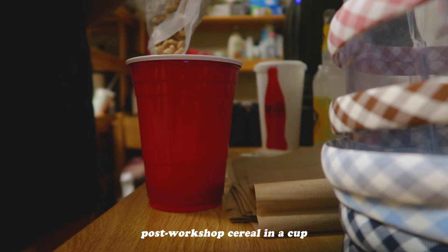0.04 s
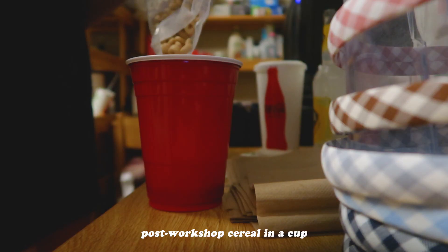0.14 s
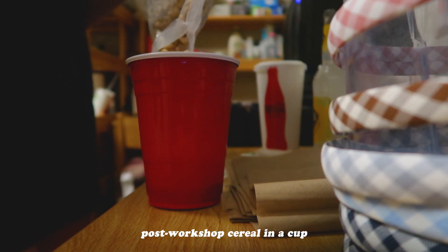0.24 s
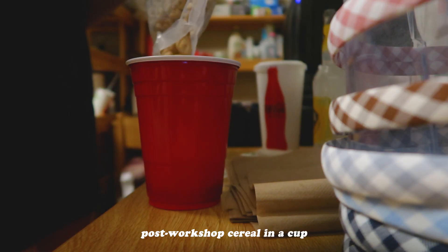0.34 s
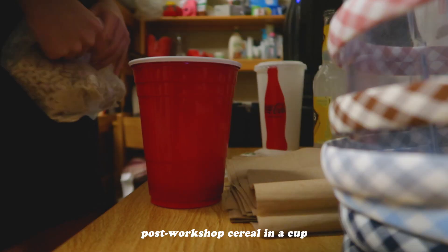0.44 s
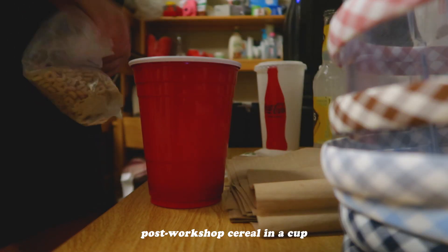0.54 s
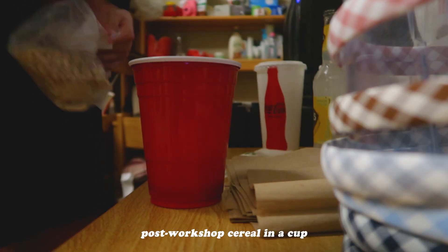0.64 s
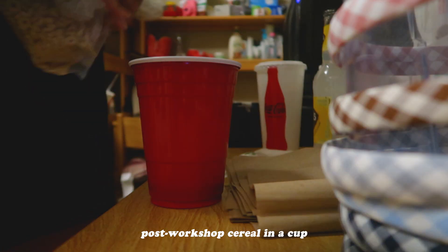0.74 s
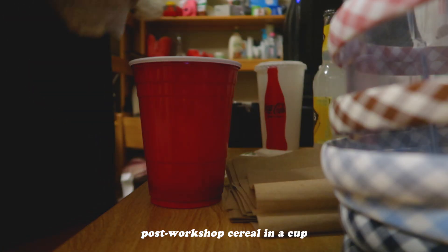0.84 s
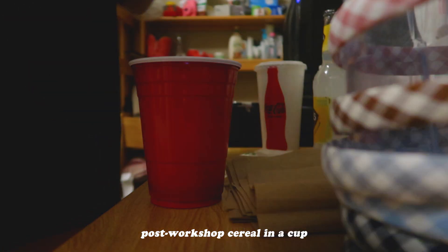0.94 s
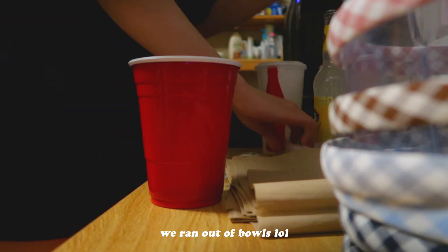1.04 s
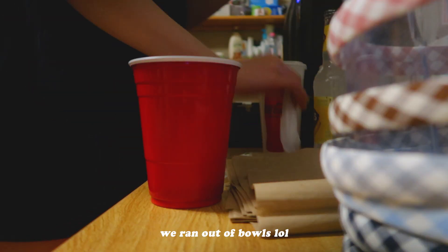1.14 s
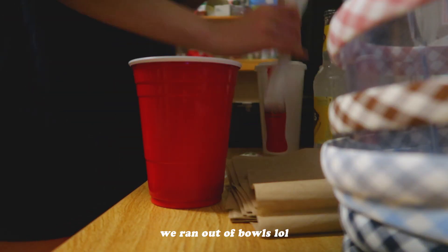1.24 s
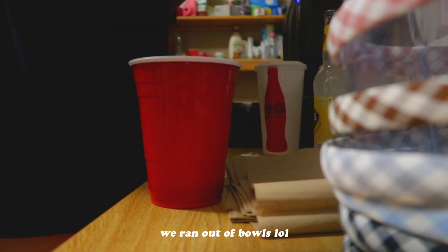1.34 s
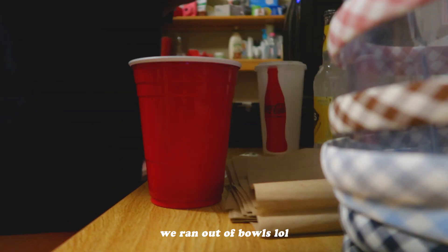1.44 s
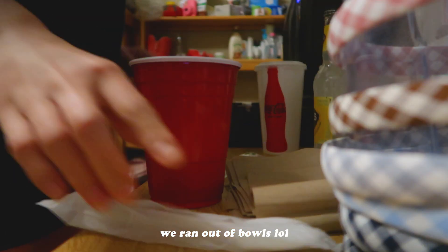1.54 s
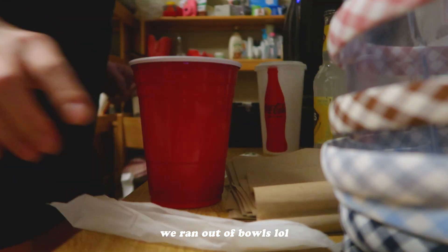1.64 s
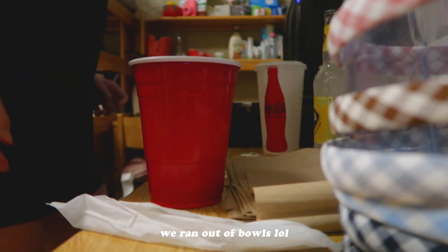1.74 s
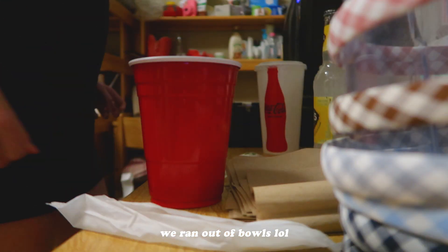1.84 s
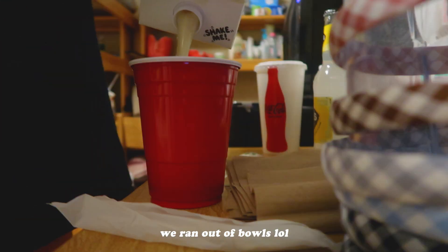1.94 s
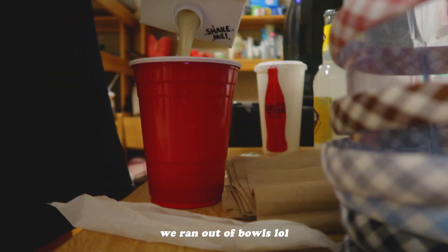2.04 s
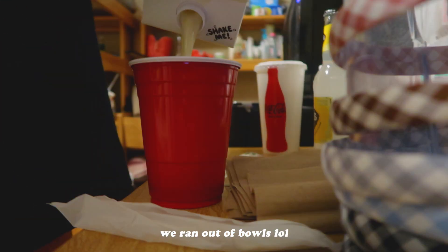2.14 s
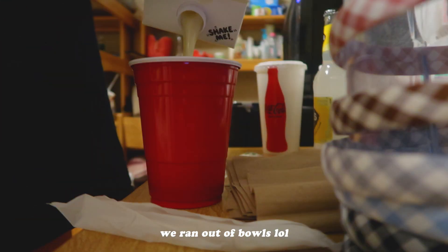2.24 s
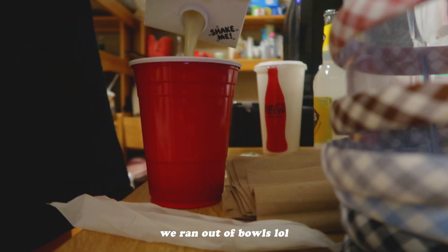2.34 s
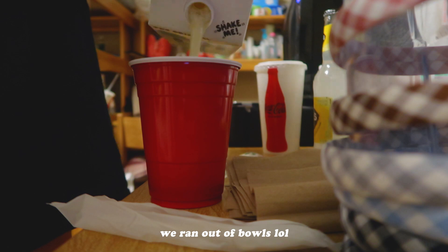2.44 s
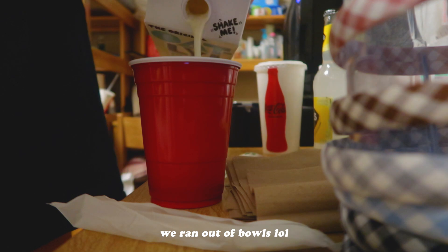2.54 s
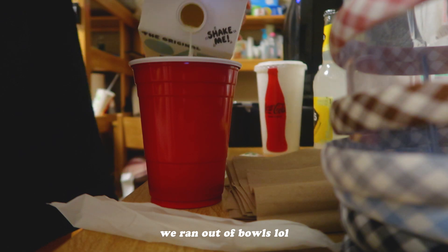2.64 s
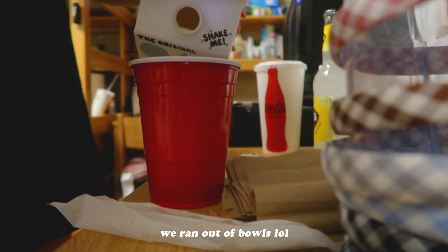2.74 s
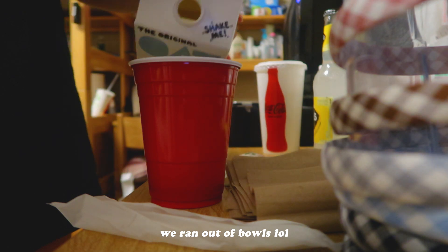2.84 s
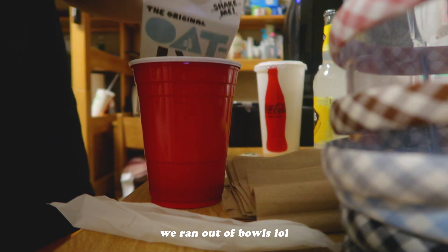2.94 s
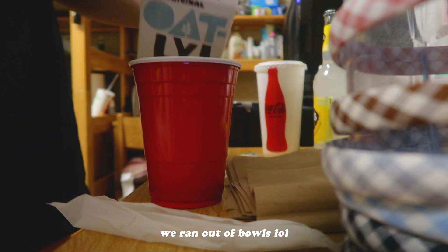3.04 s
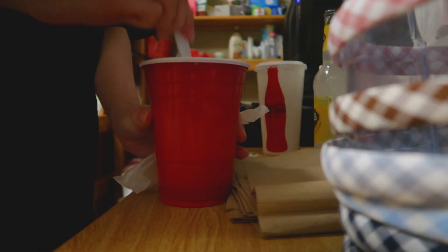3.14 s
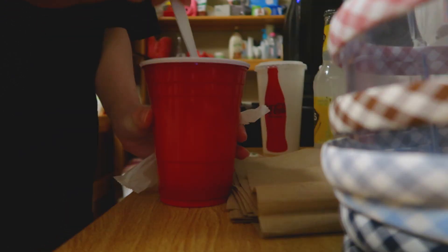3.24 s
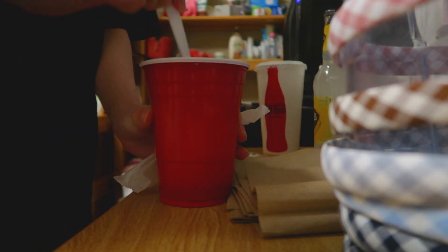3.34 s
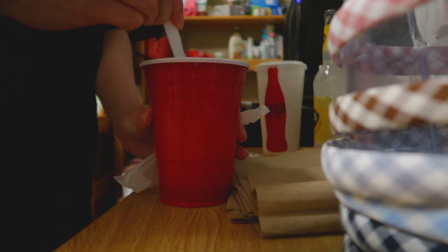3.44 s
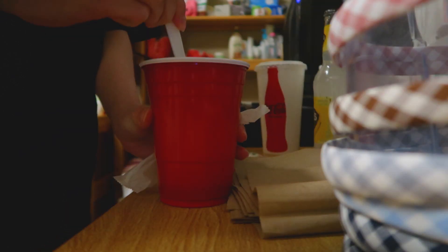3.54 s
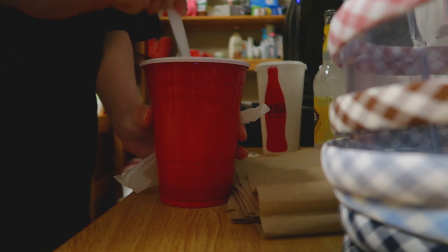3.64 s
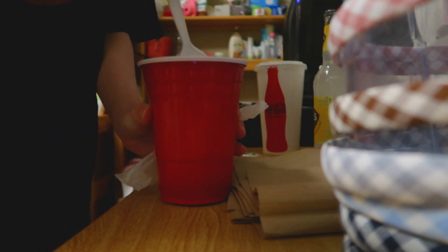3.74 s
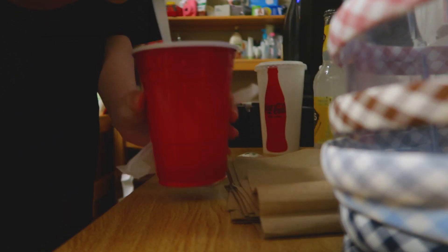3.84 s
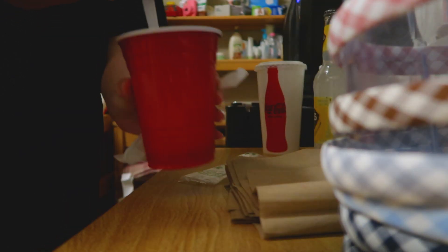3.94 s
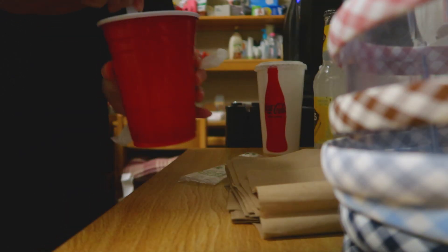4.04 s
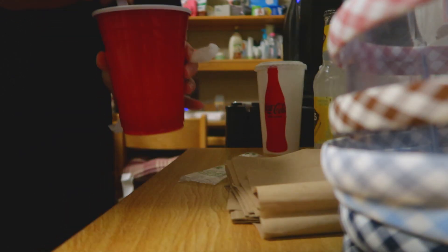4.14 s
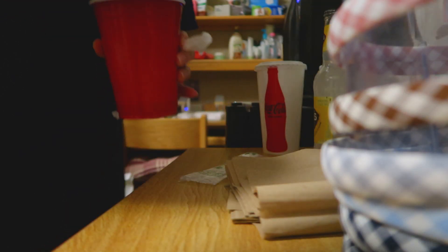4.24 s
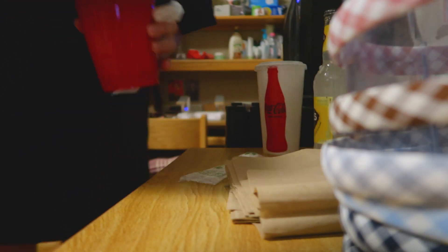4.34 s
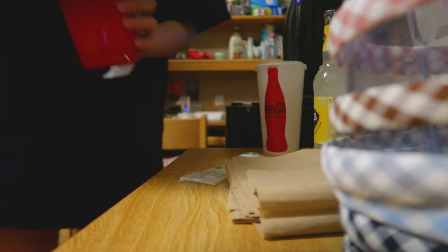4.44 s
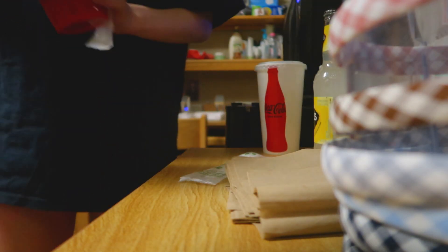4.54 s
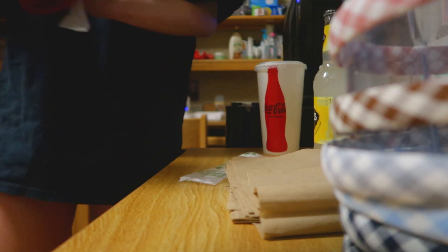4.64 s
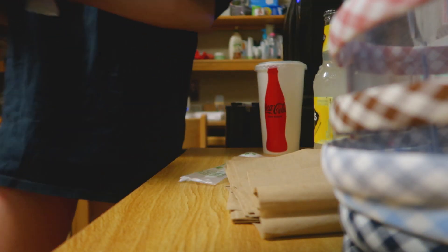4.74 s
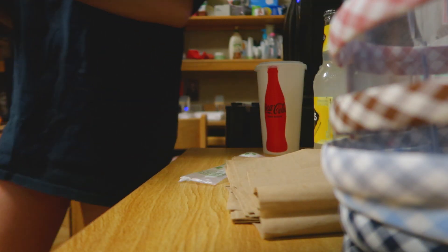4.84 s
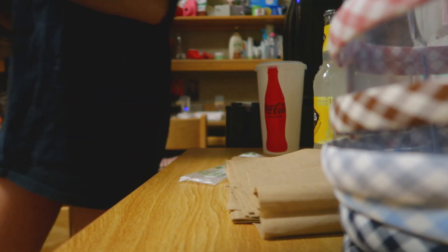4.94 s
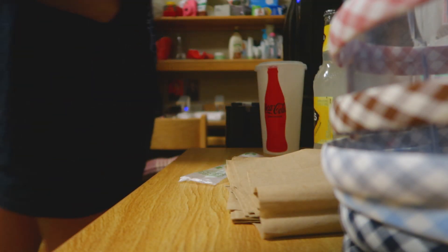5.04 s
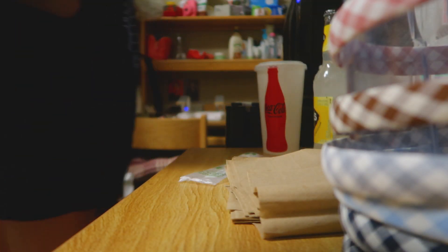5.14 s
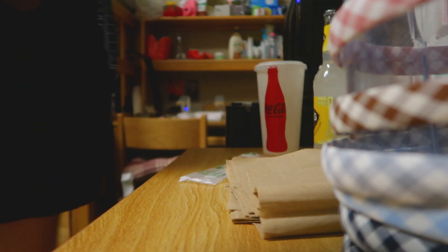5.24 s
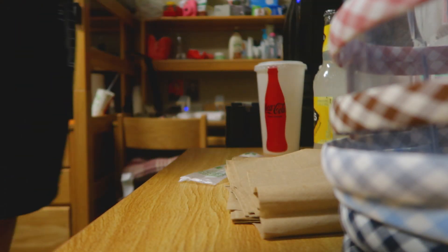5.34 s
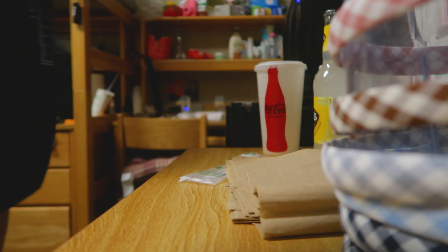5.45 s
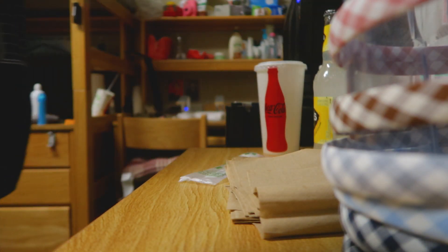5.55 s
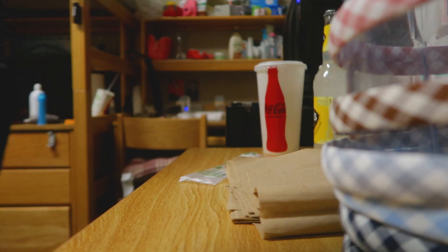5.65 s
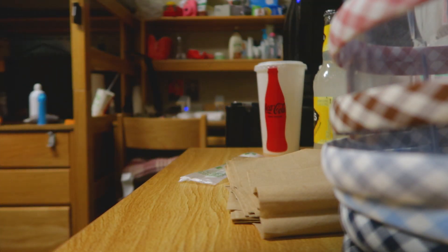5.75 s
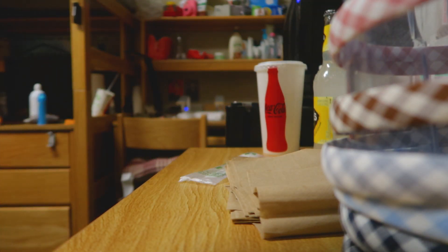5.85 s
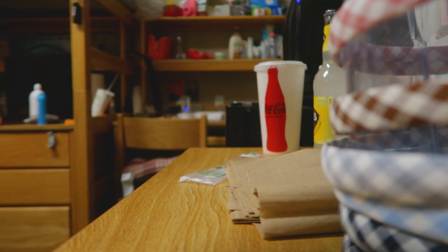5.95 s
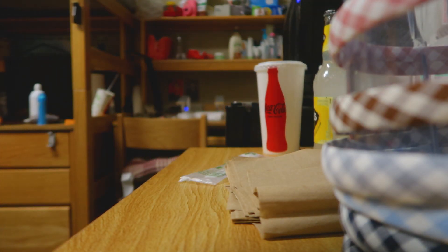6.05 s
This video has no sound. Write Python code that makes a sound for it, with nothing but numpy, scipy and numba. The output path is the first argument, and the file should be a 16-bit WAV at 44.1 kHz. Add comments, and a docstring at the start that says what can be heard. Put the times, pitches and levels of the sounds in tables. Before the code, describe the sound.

A close, dry stereo perspective at a wooden desk in a small ventilated room. From 0 to 0.43 s, dry cereal pieces drop irregularly into a nearly empty plastic cup, cracking, hopping and briefly ringing its wall over trickling crumbs. From 0.44 to 1.04 s a stiff plastic bag crumples with bright, sharp folds, while a low hum comes up underneath. Soft desk thumps at about 1.06 s lead into papery napkin rustling, strongest near 1.5 s. A plastic spoon clacks down at 1.6 s, bouncing until 1.72 s with tiny late ticks. Milk begins faintly around 2.0 s, swells at 2.25 s, patters with fine bubbles and fades into drips by 3.1 s. From 3.15 to 4.6 s a spoon crunches through cereal and knocks the damped cup, with low bumps near 3.5 s. Quiet clothing rustles from 4.8 s to the end, around 6 s, over the hum.

```python
"""In a small ventilated room with a faint hum, at a wooden desk, a snack is made, heard through two nearby ports.
Dry cereal cracks into a plastic cup, a bag is crumpled, a napkin is fetched and a plastic spoon clacks down.
Milk patters and bubbles, the spoon crunches through the cereal and knocks on the cup, then clothes rustle.
Impacts are decaying resonances with noise bursts; rustles, pouring and crunching are crowds of tiny snaps,
shaped by moves that swell, hold and die away or by curves of level."""
import sys
import numpy as np
from scipy import signal
from scipy.fft import rfft, irfft, next_fast_len
from scipy.io import wavfile
from scipy.ndimage import uniform_filter1d
from numba import njit

SR = 44100
rng = np.random.default_rng(int(sys.argv[2]) if len(sys.argv) > 2 else 0)


def to_wav(sig):
    """Store sig (one row per channel, or 1-D mono) as 16-bit WAV at the path in sys.argv[1].

    Samples outside -1..1 are clipped; the rate is SR.
    """
    pcm = np.clip(np.atleast_2d(sig), -1, 1) * 32767
    pcm = np.round(pcm).astype(np.int16)
    wavfile.write(sys.argv[1], SR, pcm.T)  # frames by channels


N = 268076
T = np.arange(N) / SR
TAIL = T[:SR // 3]  # time axis of a single impact


def amp(db):
    """Level law: decibels to amplitude gain."""
    return 10 ** (np.asarray(db) / 20)


def unit(x):
    """Normalisation of energy: scale to rms 1."""
    return x / np.sqrt(np.mean(x ** 2) + 1e-18)


def add(track, s, sound):
    """Superposition: mix a sound in at a time. Its two rows are sum and difference of the ports."""
    i = int(np.clip(s * SR, 0, N - 1))
    track[:, i:i + sound.shape[1]] += sound[:, :N - i]


def colour(x, points):
    """Minimum-phase filtering: a causal filter with a (Hz, dB) outline, built from its cepstrum."""
    size = next_fast_len(x.shape[-1] // 2 + 2048) * 2
    hz, db = np.transpose(points)
    f = np.arange(size // 2 + 1) * SR / size
    outline_db = np.interp(np.log(f + 1), np.log(hz), db)
    cepstrum = irfft(np.log(amp(outline_db)))
    # folding the cepstrum onto positive time makes the filter causal
    cepstrum[1:size // 2] *= 2
    cepstrum[size // 2 + 1:] = 0
    response = np.exp(rfft(cepstrum))
    return irfft(rfft(x, size) * response)[..., :x.shape[-1]]


def band(x, hz, kind):
    """Band splitting: a steep low-pass or high-pass."""
    sos = signal.butter(4, min(hz, SR / 2 - 1), kind, fs=SR, output="sos")
    return signal.sosfilt(sos, x)


def fade(t60):
    """Exponential damping: 60 dB of decay in t60 seconds."""
    return np.exp(-np.log(1000) * TAIL / t60)


def ring(hz, t60, rise_s=0.00042, glide=0):
    """Damped resonance: one struck mode swells over the contact time; its pitch may rise as it dies."""
    t = TAIL[TAIL < 1.2 * t60]
    cycles = hz * (t + glide * t ** 2 / t60 / 2) + rng.random((2, 1))
    swell = 1 - np.exp(-(t / rise_s) ** 2)
    tone = swell * fade(t60)[:len(t)] * np.sin(2 * np.pi * cycles)
    return np.pad(tone, ((0, 0), (0, len(TAIL) - len(t))))


def burst(t60):
    """Incoherent scattering: exponentially decaying noise."""
    return fade(t60) * rng.standard_normal((2, len(TAIL)))


def strike(modes, detune, scatter_db):
    """Modal excitation: every blow lands elsewhere and so weights the modes differently."""
    total = 0
    for hz, db, t60 in modes:
        level_chance, pitch_chance = rng.uniform(-0.57, 1, 2)
        mode = ring(hz * (1 + detune * pitch_chance), t60)
        total = total + amp(db + scatter_db * level_chance) * mode
    return total


def drift(t, per_s):
    """Slow random modulation: straight lines between random values."""
    return np.interp(t * per_s, np.arange(len(TAIL)), rng.standard_normal(len(TAIL)))


def strokes(rows):
    """Power addition: gains of body and treble for moves that swell, hold and die away."""
    power = np.zeros((2, N))
    for s, db, attack_s, hold_s, release_s, treble_db in rows:
        span = slice(*np.searchsorted(T, [s - 2 * attack_s, s + hold_s + 2 * release_s]))
        before, after = (s - T[span]) / attack_s, (T[span] - s - hold_s) / release_s
        away = np.maximum(before, after).clip(0)
        # attack and release are the times for 20 dB
        power[:, span] += amp([[db], [db + treble_db]]) ** 2 * amp(-20 * away) ** 2
    return np.sqrt(power)


def follow(curve):
    """Envelope control: gains along a curve of (s, dB, ..) rows, silent outside it."""
    s, *levels = np.transpose(curve)
    inside = (T >= s[0]) & (T <= s[-1])
    return np.array([amp(np.interp(T, s, db)) for db in levels]) * inside


@njit
def resonate(x, hz, width):
    """Time-varying resonance: a band-pass whose centre moves from sample to sample."""
    out, mid, low = np.empty(len(x)), 0., 0.
    for i in range(len(x)):
        g, k = np.tan(np.pi * hz[i] / SR), width / hz[i]
        v = (mid + g * (x[i] - low)) / (1 + g * (g + k))
        mid, low, out[i] = 2 * v - mid, low + 2 * g * v, k * v
    return out


def crackle(gains, outline, rate, spread_db, snap_t60, rub_db=-12, split_hz=4000, air=(),
            air_rise_per_s=0, tail_db=-1, patchy_db=2.0, count=16):
    """Stochastic snapping: tiny snaps of uneven size and pitch over a faint rub; gains drive body and treble."""
    shifts_per_s, air_wander = 25, 0.03
    active = np.flatnonzero(gains[0])
    span = slice(active[0], active[-1] + 1)
    t = T[span]
    chance = rng.random(N)[span]
    size = rng.exponential(size=N)[span]
    facet = rng.integers(count, size=N)[span]
    polarity = rng.choice([-1, 1], (2, N))[:, span]
    snaps = (chance < rate / SR) * amp(spread_db * np.minimum(size, 4)) * polarity  # rate: snaps per second
    scatter, rub = rng.standard_normal((2, 2, N))[..., span]
    keep = np.exp(-2 * np.log(1000) / (snap_t60 * SR))  # power kept per sample
    # each snap comes from one facet: large facets clack low, small ones tick high; strain wanders between them
    force = 0
    for k, hz in enumerate(np.geomspace(400, 13000, count)):
        clicks = amp(patchy_db * drift(t, shifts_per_s)) * snaps * (facet == k)
        tail_power = signal.lfilter([1 - keep], [1, -keep], clicks[0] ** 2 + 1e-18)
        tails = np.sqrt(tail_power) * np.roll(scatter, k * len(t) // count, axis=1)
        knock = clicks + amp(tail_db) * tails
        force = force + signal.lfilter(*signal.iirpeak(hz, 2, SR), knock) + amp(-11.0) * knock
    sound = colour(unit(force) + amp(rub_db) * rub, outline)
    for hz, width, db in air:  # the air in the cup shifts as things move in it
        centre = hz * np.exp(air_rise_per_s * (t - t.mean()) + air_wander * drift(t, shifts_per_s))
        sound = sound + amp(db) * np.array([resonate(row.copy(), centre, float(width)) for row in sound])
    # a big snap relieves its neighbours: the short-term level is evened out
    sound = sound / np.sqrt(uniform_filter1d(sound[0] ** 2, size=1800) + 1e-12)
    body, treble = unit(band(sound, split_hz, "low")), unit(band(sound, split_hz, "high"))
    out = np.zeros((2, N))
    out[:, span] = gains[0, span] * body + gains[1, span] * treble
    return out


# Spectrum of brittle cracks. Each row: frequency in Hz, level in dB.
CRACK_SPECTRUM = [(800, -55), (2800, 2), (6200, -1.5), (8000, -20), (15500, -25)]


def crack(t60=0.011):
    """Brittle fracture: a short burst of bright noise as something gives way."""
    return colour(burst(t60), CRACK_SPECTRUM)


def buckle(rows, outline, t60, sheet_t60, sheet_db):
    """Snap-through buckling: a fold gives a short pitched tick and a crack, and shakes the sheet around it."""
    out = np.zeros((2, N))
    for s, db, hz, crack_db in rows:
        sheet = colour(burst(sheet_t60), outline)
        add(out, s, amp(db) * (ring(hz, t60) + amp(sheet_db) * sheet + amp(crack_db) * crack()))
    return out


# Curve of the low hum. Each row: time in seconds, level in dB before the tone and rumble balance.
HUM_CURVE = [(0, -94), (0.45, -52), (1.15, -45.5), (1.65, -50.5), (6.08, -50.5)]
# Spectrum of the ventilation noise. Each row: frequency in Hz, relative level in dB.
ROOM_SPECTRUM = [(65, -22), (110, -7), (274, -4.5), (500, -16), (1070, -20), (2610, -28), (7060, -38),
                 (12600, -45), (15500, -62)]
HUM_HZ, ROOM_DB = 57.5, -51


def background(tone_db=-5.0, rumble_db=-3):
    """Stationary noise and phase modulation: ventilation, and a slightly wavering hum with its rumble."""
    tone = unit(np.sin(2 * np.pi * HUM_HZ * T + 0.14 * drift(T, 6)))
    rumble_spectrum = [(10, -6), (50, -5), (115, 0.0), (250, -35), (2000, -83)]
    rumble = unit(colour(rng.standard_normal((2, N)), rumble_spectrum))
    hum_gain = amp(np.interp(T, *np.transpose(HUM_CURVE)))
    hum = hum_gain * (amp(tone_db) * tone + amp(rumble_db) * rumble)
    ventilation = unit(colour(rng.standard_normal((2, N)), ROOM_SPECTRUM))
    return hum + amp(ROOM_DB) * ventilation


# Soft bumps on the desk. Each row: start in seconds, level in dB, pitch in Hz, 60 dB decay in seconds.
DESK_BUMPS = [(1.058, -25, 320, 0.057), (1.125, -25.5, 139, 0.18), (1.141, -31, 223, 0.12),
              (1.644, -26, 303, 0.069), (1.646, -31.5, 75.1, 0.14), (3.463, -24.5, 139.5, 0.12),
              (3.519, -22.5, 133, 0.043)]


def desk(push_s=0.0013, thud_db=2.0, thud_t60=0.43):
    """Soft-contact excitation: a push builds up over a few milliseconds and leaves a low boom."""
    out = np.zeros((2, N))
    for s, db, hz, t60 in DESK_BUMPS:
        boom = burst(thud_t60) * (1 - fade(0.0071))
        thud = colour(boom, [(40, -12), (150, -4.5), (1000, -9.0), (3000, -45)])
        add(out, s, amp(db) * (ring(hz, t60, rise_s=push_s) + amp(thud_db) * thud))
    return out


# Clothes brushing with each move.
# Each row: start of the hold in seconds, level in dB, attack in seconds, treble against body in dB.
CLOTH_BRUSHES = [(4.796, -43, 0.11, -7.5), (5.041, -50, 0.24, -6), (5.15, -53, 0.31, -1),
                 (5.288, -47.5, 0.025, -1), (5.42, -56, 0.1, -1.5), (5.54, -60, 0.075, 4),
                 (5.706, -47, 0.0046, 4), (5.83, -50, 0.078, 0), (5.949, -41, 0.19, -6.5)]
# Spectrum of rubbing cloth. Each row: frequency in Hz, relative level in dB.
CLOTH_SPECTRUM = [(210, -33), (400, -10), (1050, 5), (1660, -3), (2350, 2), (3940, -10.5), (8380, -30.5),
                  (15000, -60)]
BRUSH_HOLD_S, BRUSH_RELEASE_S = 0.021, 0.12


def clothes():
    """Sliding friction: dense small snaps of the fibres make a soft rub."""
    brushes = [(s, db, attack_s, BRUSH_HOLD_S, BRUSH_RELEASE_S, treble_db)
               for s, db, attack_s, treble_db in CLOTH_BRUSHES]
    return crackle(strokes(brushes), CLOTH_SPECTRUM, rate=4000, spread_db=3.5, snap_t60=0.022, rub_db=-13.0)


# The napkin is gripped, lifted, swung over and laid down. Each row: start of the hold in seconds,
# level in dB, attack, hold and release in seconds, treble against body in dB.
NAPKIN_MOVES = [(1.045, -46.5, 0.006, 0.034, 0.26, -7.5), (1.2, -54, 0.12, 0.098, 0.15, -0.5),
                (1.42, -42.5, 0.096, 0.031, 0.064, -7.5), (1.495, -39.5, 0.059, 0.044, 0.014, -9),
                (1.565, -45, 0.041, 0.018, 0.022, -11)]
# Spectrum of crinkling paper. Each row: frequency in Hz, relative level in dB.
NAPKIN_SPECTRUM = [(240, -40), (400, -5.5), (1300, -10.5), (1750, -3.5), (2650, 0), (3510, -6.5),
                   (6000, -14), (15500, -26)]


def napkin():
    """Crumpling noise: paper crinkles in sparse, very short snaps."""
    return crackle(strokes(NAPKIN_MOVES), NAPKIN_SPECTRUM, rate=1100, spread_db=2.0, snap_t60=0.012)


# Creases of paper or cloth. Each row: start in seconds, level in dB, pitch in Hz,
# bright crack in dB against that level.
SHEET_CREASES = [(1.313, -24, 3040, -20), (1.418, -18, 2660, -22), (1.448, -30, 4000, -10),
                 (1.4828, -15, 2330, -22), (1.522, -19, 2080, -20), (1.535, -25, 2720, -8),
                 (1.569, -24, 1630, -20), (4.953, -35.5, 4050, 3), (5.289, -28, 2660, -9)]


def creases():
    """Snap-through of soft sheets: single creases of paper or cloth tick over."""
    return buckle(SHEET_CREASES, NAPKIN_SPECTRUM, t60=0.007, sheet_t60=0.0084, sheet_db=-9.5)


# The bag is crumpled in one go. Each row: time in seconds, level of the body in dB, of the treble in dB,
# both before the wavering grip.
BAG_CURVE = [(0.444, -32, -24.5), (0.462, -25.5, -28), (0.534, -33, -32), (0.57, -29, -28),
             (0.63, -27, -26), (0.724, -37, -34), (0.855, -32, -26), (0.89, -31.5, -26.5),
             (0.98, -30.5, -27.5), (1.034, -29.5, -22.5), (1.042, -36, -32)]
# Folds of the film buckling. Each row: start in seconds, level in dB, pitch in Hz,
# bright crack in dB against that level.
BAG_FOLDS = [(0.443, -7.5, 2720, -13), (0.609, -9, 1330, -18), (0.638, -18, 3270, 7.5),
             (0.662, -18, 1980, -2), (0.772, -14.5, 1000, -20), (0.823, -14, 1790, -18),
             (0.867, -6.5, 2760, -8.5), (0.924, -7.5, 2470, -8.5), (0.985, -15, 1780, -16),
             (1.013, -5, 1970, -22), (1.033, -4, 2380, -9)]
# Spectrum of the film. Each row: frequency in Hz, relative level in dB.
BAG_SPECTRUM = [(71, -43), (120, -8.5), (282, -0.5), (530, -3), (748, -7.5), (1040, -5.5), (1500, -2.5),
                (2540, 0), (3700, -7), (5840, -13.5), (9910, -25), (12100, -23.5), (15500, -39)]
# Cup air ringing along with the bag. Each row: frequency in Hz, width in Hz, lift in dB.
BAG_CUP_AIR = [(1020, 130, -4.5)]


def bag():
    """Crumpling under a wavering grip: stiff film snaps in a crowd, and single folds buckle sharply."""
    squeezes_per_s, squeeze_db = 70, 1.2
    grip = follow(BAG_CURVE) * amp(squeeze_db * drift(T, squeezes_per_s))
    film = crackle(grip, BAG_SPECTRUM, rate=1900, spread_db=0.8, snap_t60=0.013, split_hz=1330, air=BAG_CUP_AIR)
    return film + buckle(BAG_FOLDS, BAG_SPECTRUM, t60=0.0082, sheet_t60=0.022, sheet_db=-3.5)


def tick(t60=0.0052):
    """Broadband impulse: a very short, bright crack."""
    spectrum = [(300, -13), (1500, 0), (4500, -5.5), (7500, -8.5), (10000, -2.5), (15000, -16.0)]
    return colour(burst(t60), spectrum)


# Modes of spoon and desk top. Each row: frequency in Hz, relative level in dB, 60 dB decay in seconds.
SPOON_AND_DESK_MODES = [(320, -16, 0.16), (480, -6, 0.12), (1070, 0, 0.03), (1366, 4.5, 0.054),
                        (1685, -1, 0.078), (2100, -1, 0.035), (2930, -8, .04), (3270, -7, 0.13),
                        (3800, 3, 0.04), (4427, 0, 0.068), (5900, -14, 0.086)]


def clack(hz, tick_db, contact_t60=0.0068, body_db=-26.0):
    """Hard-contact excitation: stiff plastic gives a short pitched clack and a tick, then rings on."""
    body = strike(SPOON_AND_DESK_MODES, detune=0.018, scatter_db=2.5)
    return ring(hz, contact_t60, rise_s=0.000085) + amp(tick_db) * tick() + amp(body_db) * body


# The spoon bounces on the desk and settles. Each row: start in seconds, level in dB, contact pitch in Hz,
# sharp tick in dB against that level, level of the chatter in dB.
SPOON_BOUNCES = [(1.6036, -2, 2650, -4, -21), (1.636, -11, 2870, -10, -33), (1.6425, -7, 3240, -0.5, -21.5),
                 (1.6765, -4, 2680, -37, -26), (1.72, -25.5, 3260, -6, -32.5),
                 (1.856, -29, 3460, -2.5, -61), (1.86, -28, 1370, -20, -62), (1.91, -31, 2670, -32, -77)]
# Spectrum of the chatter. Each row: frequency in Hz, relative level in dB.
CHATTER_SPECTRUM = [(88, -20), (326, -10), (650, -11), (1510, -9.5), (4560, -14), (15500, -26)]
CHATTER_ATTACK_S, CHATTER_HOLD_S, CHATTER_RELEASE_S, CHATTER_TREBLE_DB = 0.008, 0.0045, 0.026, -22


def spoon_drop():
    """Repeated impact: the spoon clacks on the desk and chatters briefly around each bounce."""
    chatter = [(s, db, CHATTER_ATTACK_S, CHATTER_HOLD_S, CHATTER_RELEASE_S, CHATTER_TREBLE_DB)
               for s, *_, db in SPOON_BOUNCES]
    out = crackle(strokes(chatter), CHATTER_SPECTRUM, rate=3500, spread_db=3.5, snap_t60=0.0068, rub_db=-22)
    for s, db, hz, tick_db, _ in SPOON_BOUNCES:
        add(out, s, amp(db) * clack(hz, tick_db))
    return out


FOAM_FROM_S, FOAM_TO_S, FOAM_LOW_HZ, FOAM_HIGH_HZ = 2.14, 2.84, 2400, 14000
FOAM_DB, FOAM_TILT_DB = -43.5, -2.5  # mean level of the largest bubbles, and its change per octave


def foam(count=110):
    """Bubble resonance: the smaller a bubble, the higher, shorter and on average fainter its pop."""
    cycles, scatter_db = 55, 3.5  # cycles within the 60 dB decay
    out = np.zeros((2, N))
    for when, size, luck in rng.random((count, 3)):
        hz = FOAM_LOW_HZ * (FOAM_HIGH_HZ / FOAM_LOW_HZ) ** size
        db = FOAM_DB + FOAM_TILT_DB * np.log2(hz / FOAM_LOW_HZ) + scatter_db * (2 * luck - 1)
        add(out, FOAM_FROM_S + when * (FOAM_TO_S - FOAM_FROM_S), amp(db) * ring(hz, cycles / hz))
    return out


# Flow of the milk. Each row: time in seconds, level in dB before the wavering.
MILK_FLOW = [(2.0, -64), (2.11, -56), (2.245, -37.5), (2.36, -41.5), (2.57, -43.5), (2.76, -48.5),
             (2.93, -57), (3.13, -59)]
# Bubbles and drips. Each row: start in seconds, level in dB, starting pitch in Hz,
# splash in dB against that level.
MILK_DRIPS = [(2.197, -32, 2550, -7), (2.217, -29.5, 2680, -11), (2.234, -30, 2780, -8),
              (2.321, -29, 2520, -8), (2.39, -40, 4280, -4), (2.469, -32, 2540, 4),
              (2.688, -42.5, 4100, -4), (2.7205, -33.5, 2200, 10.5), (3.054, -36, 1000, -12),
              (3.098, -38.5, 1845, -22)]
# Spectrum of the patter. Each row: frequency in Hz, relative level in dB.
MILK_SPECTRUM = [(210, -49), (450, -3.5), (774, -8), (1050, -4), (1650, -7.5), (2540, -3.5), (3200, -11),
                 (5980, -18.5), (15500, -35.5)]
# Air above the cereal during the pour. Each row: mid-pour frequency in Hz, width in Hz, lift in dB.
POURING_AIR = [(1056, 84, 7.9), (2600, 190, 2.6)]
MILK_TREBLE_DB = -18  # against the body


def milk(splash_t60=0.013):
    """Air-column and bubble resonance: a wavering stream patters as the column shortens; drips splash and ring."""
    bubble_t60, gulps_per_s, gulp_db = 0.04, 45, 0.8
    waver = amp(gulp_db * drift(T, gulps_per_s))
    gains = follow(MILK_FLOW) * amp([[0], [MILK_TREBLE_DB]]) * waver
    out = crackle(gains, MILK_SPECTRUM, rate=1800, spread_db=0.5, snap_t60=0.025,
                  air=POURING_AIR, air_rise_per_s=0.11)
    for s, db, hz, splash_db in MILK_DRIPS:
        splash = colour(burst(splash_t60), MILK_SPECTRUM)
        add(out, s, amp(db) * (ring(hz, bubble_t60, glide=0.046) + amp(splash_db) * splash))
    return out + foam()


# Strokes of the spoon through the cereal. Each row: start of the hold in seconds, level in dB,
# attack, hold and release in seconds, treble against body in dB.
STIR_STROKES = [(3.147, -37.5, 0.0043, 0.019, 0.3, -19), (3.29, -41.5, 0.16, 0.13, 0.067, -7.5),
                (3.457, -28.5, 0.013, 0.004, 0.2, -9), (3.6, -36.5, 0.024, 0.015, 0.055, -27),
                (3.72, -42.5, 0.067, 0.023, 0.16, -9.5), (3.96, -35.5, 0.051, 0.059, 0.12, -14.5),
                (4.055, -27.5, 0.059, 0.027, 0.14, -12), (4.167, -31.5, 0.029, 0.014, 0.092, -21),
                (4.32, -39, 0.13, 0.073, 0.049, -9), (4.425, -35, 0.053, 0.068, 0.11, -6),
                (4.528, -32.5, 0.0099, 0.018, 0.19, -12)]
# The spoon knocks on the full cup. Each row: start in seconds, level in dB, pitch in Hz,
# bright crack in dB against that level.
CUP_KNOCKS = [(3.146, -28, 1880, -11), (3.152, -18.5, 1170, -18), (3.279, -22.5, 2766, -5),
              (3.400, -24, 2860, -28), (3.431, -25.5, 644.5, -22), (3.456, -14, 2800, -13),
              (3.4605, -18, 1000, -8), (3.473, -18, 3040, -12), (3.496, -20, 1150, -16),
              (3.576, -19.5, 2600, -0.5), (3.9302, -17.5, 2620, -13), (4.052, -12, 2442, -11),
              (4.12, -16.5, 2500, -26), (4.164, -15.5, 2510, -18), (4.302, -18.5, 2620, -20),
              (4.5274, -16, 2640, -22), (4.61, -29, 2600, -10)]
# Spectrum of the crunching. Each row: frequency in Hz, relative level in dB.
STIR_SPECTRUM = [(150, -34), (250, -5), (720, -5), (1100, 0), (1850, -6), (2620, -1), (3200, -8),
                 (4700, -17.5), (15500, -41)]
# Air above the cereal during stirring. Each row: mid-way frequency in Hz, width in Hz, lift in dB.
STIRRING_AIR = [(1112, 67, 0.5), (2620, 170, 0)]


def stirring(knock_t60=0.013, crunch_db=0):
    """Granular fracture and damping: cereal crunches round the spoon; the filling damps the knocked wall."""
    out = crackle(strokes(STIR_STROKES), STIR_SPECTRUM, rate=1900, spread_db=2.5, snap_t60=0.02,
                  air=STIRRING_AIR, air_rise_per_s=-0.024)
    for s, db, hz, crack_db in CUP_KNOCKS:
        wall = ring(hz, knock_t60)
        crunch = colour(burst(knock_t60), STIR_SPECTRUM)
        add(out, s, amp(db) * (wall + amp(crunch_db) * crunch + amp(crack_db) * crack()))
    return out


# Cereal pieces landing in the cup. Each row: start in seconds, level in dB,
# bright crack in dB against that level.
CEREAL_PIECES = [(0.001, -12.5, -11), (0.023, -17.5, -25), (0.037, -22, -24), (0.056, -21, -24),
                 (0.066, -14, 2), (0.076, -29, 1), (0.088, -24, -3), (0.1436, -8, -23), (0.190, -14, -13),
                 (0.221, -16.5, -23), (0.228, -9.5, -22), (0.268, -14.5, -28), (0.316, -16, -35),
                 (0.326, -14, -34), (0.362, -26, -14), (0.399, -7.5, -13), (0.422, -24, 1)]
# Wall of the nearly empty cup. Each row: frequency in Hz, relative level in dB, 60 dB decay in seconds.
EMPTY_CUP_MODES = [(707, -18, 0.059), (986, -13.5, 0.05), (1820, -8, 0.016), (2273, -3.5, 0.036),
                   (2460, -3, 0.018), (2883, -7, 0.035), (3240, -30, 0.1)]
# Spectrum of chips and crumbs. Each row: frequency in Hz, relative level in dB.
CRUMB_SPECTRUM = [(210, -58), (466, -23), (660, -14), (1100, -9.5), (2070, -12), (2310, 0), (3440, -14),
                  (4500, -22.5), (10800, -37.5), (15500, -45)]
# Air above the cereal in the nearly empty cup. Each row: frequency in Hz, width in Hz, lift in dB.
EMPTY_CUP_AIR = [(666, 54, 5.5), (1000, 34, -10)]
REBOUND_S, REBOUND_DB = 0.005, -4.5  # mean delay of the one hop, and its level against the landing
TRICKLE_DB, TRICKLE_S = -47, 0.4  # crumbs run steadily from the bag
SETTLE_DB, SETTLE_S, CRUMB_TREBLE_DB = -20, 0.11, -14.5  # each piece makes the pile settle


def cereal(ring_db=-7, chip_db=0, chip_t60=0.025, own_db=-10):
    """Granular impact: each piece cracks at its own pitch, rings the cup wall and hops once; crumbs settle."""
    trickle = [(0, TRICKLE_DB, 0.002, TRICKLE_S, SETTLE_S, CRUMB_TREBLE_DB)]
    settling = [(s, db + SETTLE_DB, 0.002, 0, SETTLE_S, CRUMB_TREBLE_DB) for s, db, _ in CEREAL_PIECES]
    out = crackle(strokes(trickle + settling), CRUMB_SPECTRUM, rate=1700, spread_db=2.5, snap_t60=0.023,
                  air=EMPTY_CUP_AIR)
    for s, db, crack_db in CEREAL_PIECES:
        hop_s = REBOUND_S * (.5 + rng.random())
        for late_s, weaker_db in (0, 0), (hop_s, REBOUND_DB):
            own_hz, shift = rng.uniform(1800, 3900), rng.uniform(0.93, 1.07)
            shifted = [(hz * shift, level_db) for hz, level_db in CRUMB_SPECTRUM]
            chip = colour(burst(chip_t60), shifted) + amp(own_db) * ring(own_hz, chip_t60 / 2)
            wall = strike(EMPTY_CUP_MODES, detune=0.01, scatter_db=9.0)
            landing = amp(ring_db) * wall + amp(chip_db) * chip + amp(crack_db) * crack()
            add(out, s + late_s, amp(db + weaker_db) * landing)
    return out


def echo(x, t60, count=40):
    """Diffuse reverberation of the small room; a fresh random noise tail is drawn for each equal time slice."""
    out = np.zeros((2, N))
    for part in np.array_split(np.arange(N), count):
        tail = burst(t60) * (1 - fade(0.00064))
        tail = tail / np.linalg.norm(tail[0])
        add(out, T[part[0]], signal.fftconvolve(x[None, part], tail, axes=1))
    return colour(out, [(100, 8.2), (1000, 0.57), (4000, 2.1), (14000, 9.0)])


# Filter on the port difference of near sounds. Each row: frequency in Hz, gain in dB.
NEAR_WIDTH = [(60, -60), (720, -20.5), (1100, -39), (1500, -21), (2400, -19), (4400, -4.5), (8100, -1.5),
              (14000, 2.5)]
# Filter on the port difference of the background. Each row: frequency in Hz, gain in dB.
FAR_WIDTH = [(60, -33), (130, -17), (330, -4.5), (1100, 1), (8000, 3)]


def scene():
    """Diffraction: long waves reach both ports alike; short ones scatter off the clutter and differ."""
    near = desk() + clothes() + napkin() + creases() + bag() + spoon_drop() + milk() + stirring() + cereal()
    near = near + amp(-9.0) * echo(near[0], t60=0.08)
    far = background()
    mid = near[0] + far[0]
    side = colour(near[1], NEAR_WIDTH) + colour(far[1], FAR_WIDTH)
    return np.array([mid + side, mid - side])


TOP_HZ = 15800


def record(dry):
    """Band limitation: a steep elliptic low-pass cuts the very top."""
    sos = signal.ellip(8, .2, 70, TOP_HZ, fs=SR, output="sos")
    return signal.sosfilt(sos, dry)


dry = scene()
out = record(dry)
to_wav(out)
```